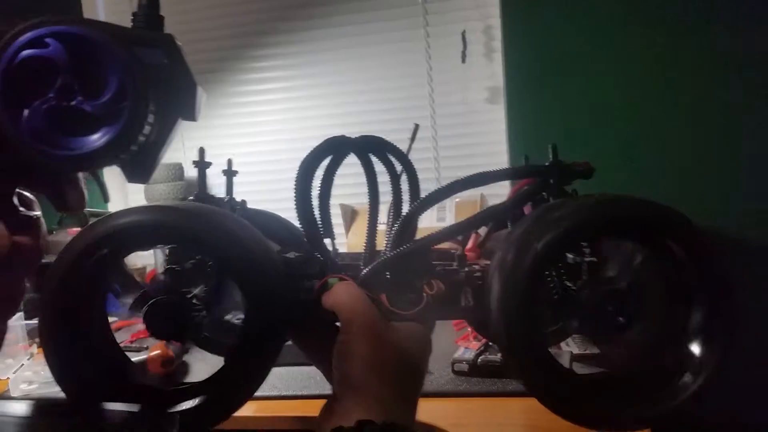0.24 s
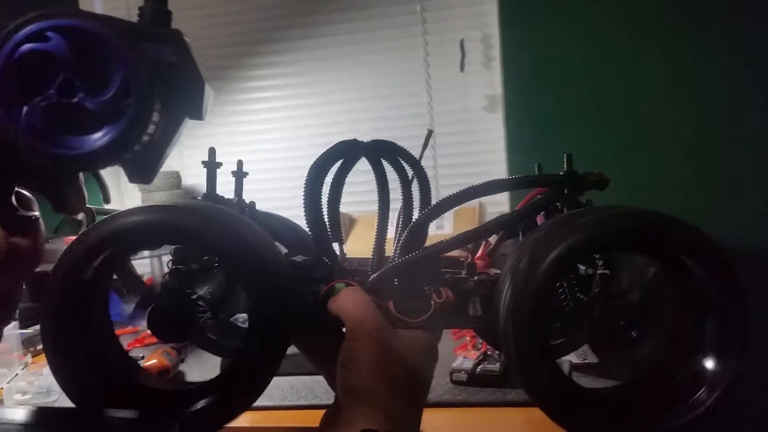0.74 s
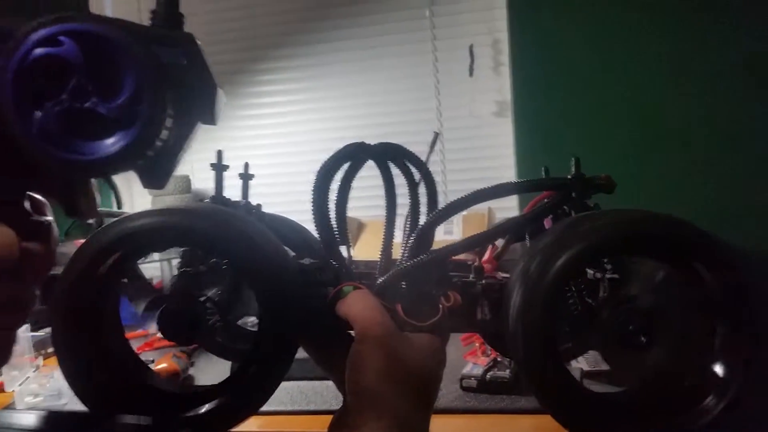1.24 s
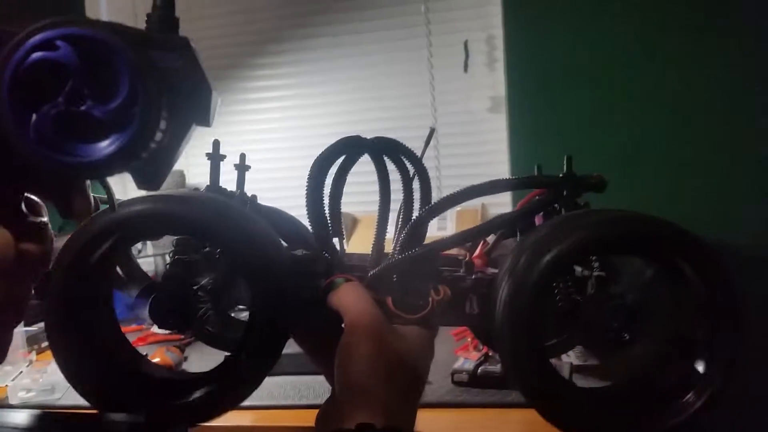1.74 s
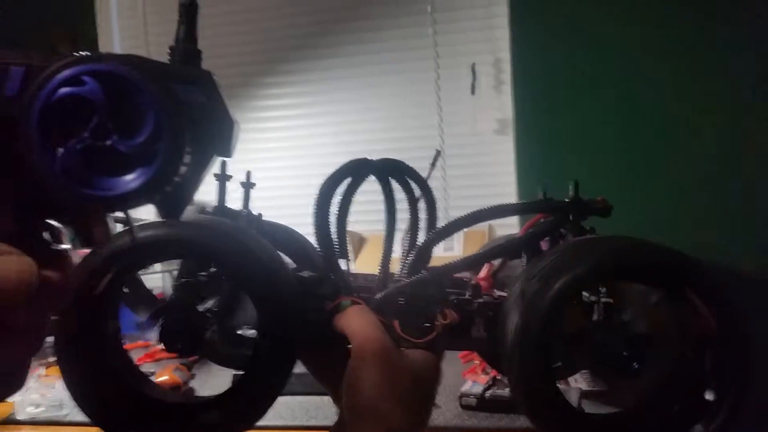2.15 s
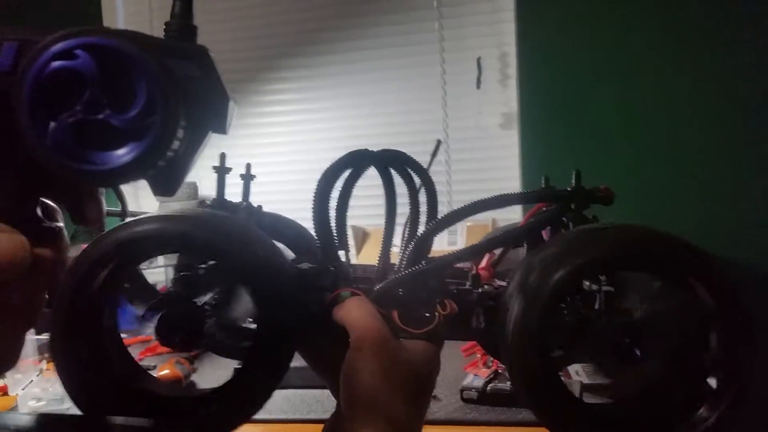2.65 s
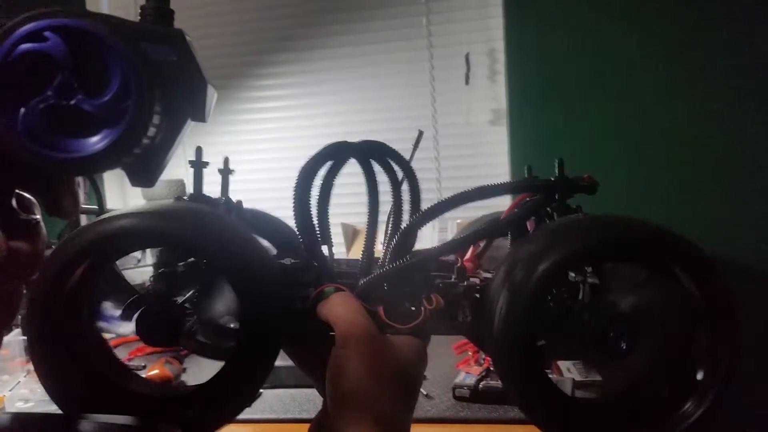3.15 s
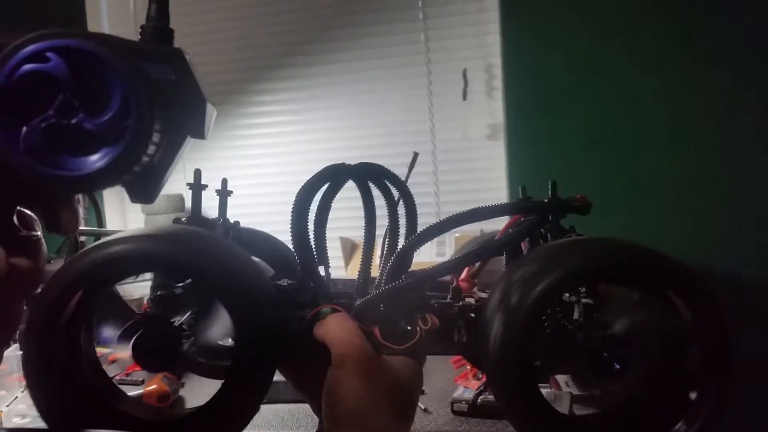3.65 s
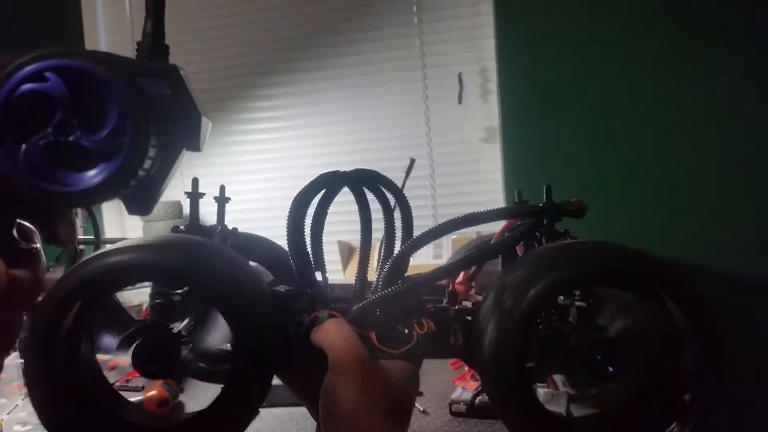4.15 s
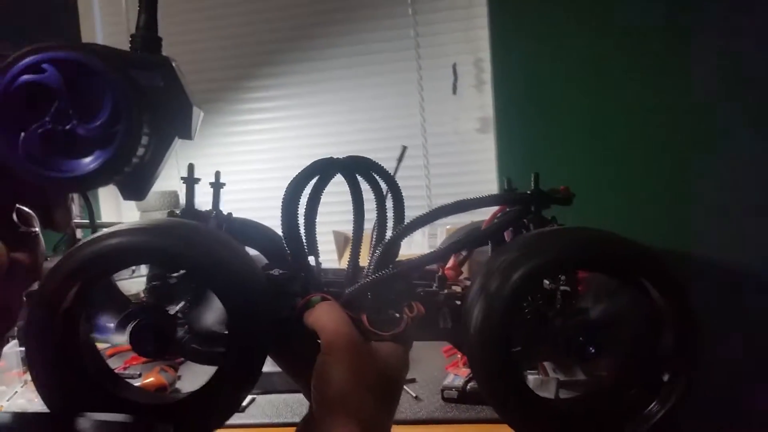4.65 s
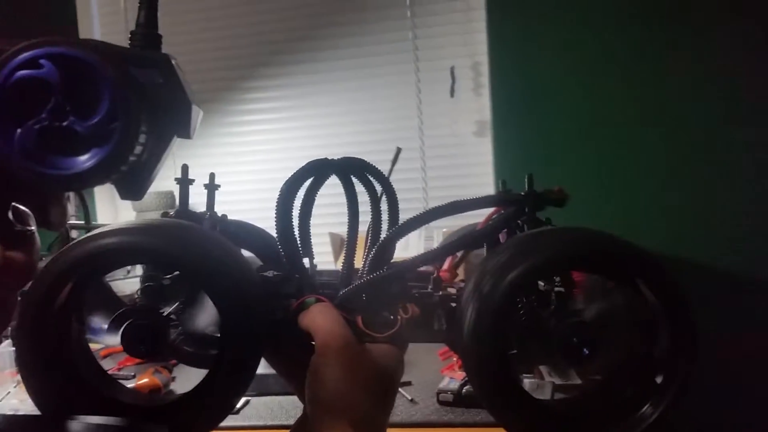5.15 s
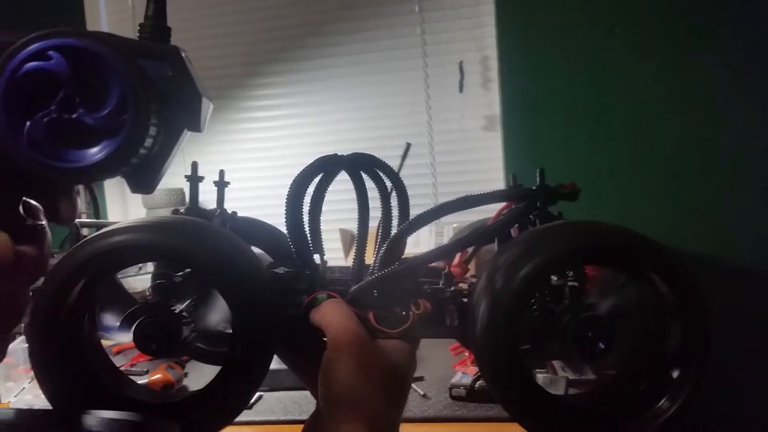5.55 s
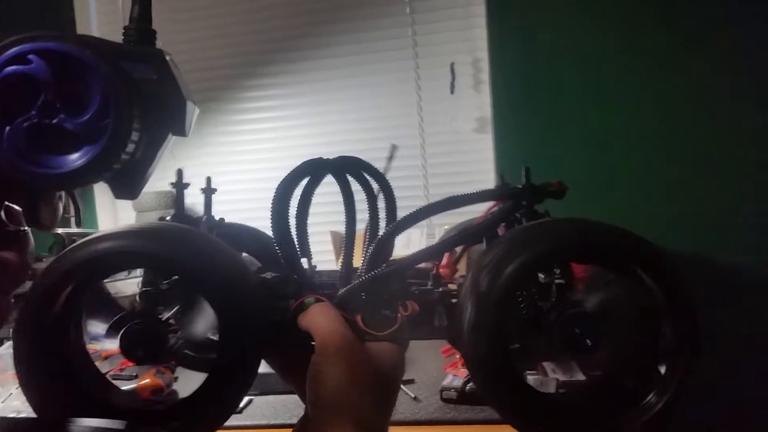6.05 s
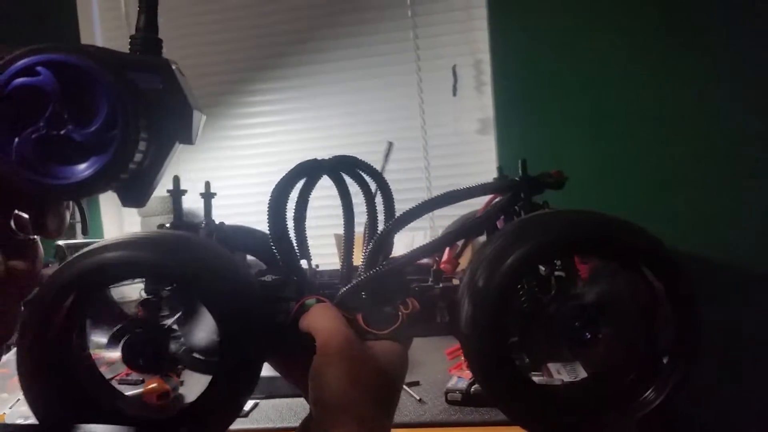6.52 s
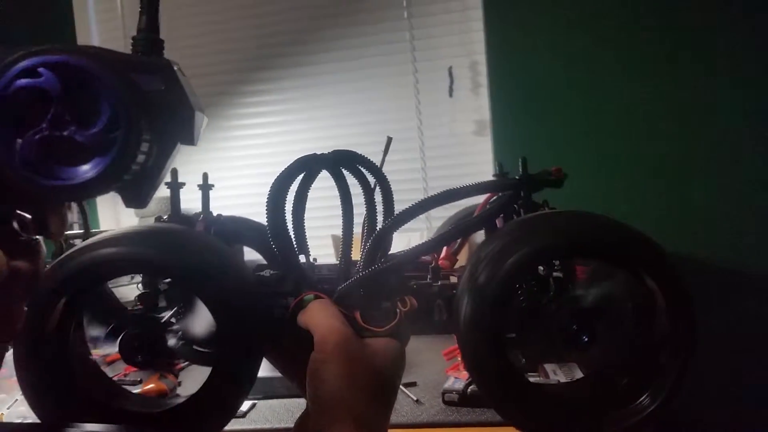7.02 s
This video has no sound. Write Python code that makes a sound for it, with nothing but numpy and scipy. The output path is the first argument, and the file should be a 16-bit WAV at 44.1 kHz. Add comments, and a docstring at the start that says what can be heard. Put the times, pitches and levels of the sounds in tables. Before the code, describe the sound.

A model truck's electric drive is already running at the start, held up close to the microphone in a garage with short, dense reflections. From 0 to 2.5 seconds a grainy, wobbling gear whine rises from about 850 to 1650 hertz, fairly subdued, with tooth scrape, loose chatter and bevel gear hum below. Low rumble from the grip lies underneath; soft thuds come near 0.5 and 1.9 seconds, then the strongest cluster at 2.1 to 2.5. From 3 to 5 seconds the whine climbs past 3 kilohertz, louder and brighter, flickering as it sweeps through resonances; slight bumps fade out before 5. From 5 to 7.3 seconds it accelerates steeply toward 8 kilohertz, a shrill scream with dense hissing rattle, ringing frame parts and a growing low tyre rush. It cuts off near top speed.

```python
"""An electric motor spins the free wheels of a model truck, held up in a garage, faster and faster.
The unloaded spur gear whines and rattles in its play: sine overtones of the tooth rate and gated noise.
Bevel gears hum under it as tones locked to the shaft, and chassis resonances colour all gear sound.
The tyres fan the air as filtered noise; an unsteady hand adds low rumble and bumps on the microphone."""
import sys
import numpy as np
from scipy import signal
from scipy.fft import rfft, irfft, next_fast_len
from scipy.io import wavfile
from scipy.ndimage import uniform_filter1d, map_coordinates

SR = 44100
rng = np.random.default_rng(int(sys.argv[2]) if len(sys.argv) > 2 else 0)


def file_out(sig):
    """Save sig as 16-bit WAV at sys.argv[1]."""
    # one column per channel
    cols = np.atleast_2d(sig).T
    # limit, then scale
    lim = np.clip(cols, -1, 1)
    pcm = np.round(lim * 32767).astype(np.int16)
    wavfile.write(sys.argv[1], SR, pcm)


N = 321048
TIME = np.arange(N) / SR
SPUR_TEETH, PINION_TEETH, BEVEL_TEETH = 58, 21, 13


def amp(db):
    """Decibels to gain."""
    return 10 ** (np.asarray(db) / 20)


def unit(x):
    """Scales to rms 1."""
    return x / np.sqrt(np.mean(x ** 2) + 1e-20)


def curves(rows, t):
    """Every column of a time table at the times t."""
    times, *columns = np.transpose(rows)
    return [np.interp(t, times, column) for column in columns]


def spectra(rows, hz):
    """Every column of a frequency table at hz, on a log axis."""
    table_hz, *columns = np.transpose(rows)
    return np.array([np.interp(np.log(hz + 1), np.log(table_hz), column) for column in columns])


def wander(position, per_unit):
    """Smooth chance of rms 1 that takes per_unit new values in each shaft turn (or second)."""
    values = rng.standard_normal(1 << 16)
    return unit(map_coordinates(values, [position * per_unit], order=3, mode="wrap"))


# the throttle opens slowly: (time [s], drive shaft speed [turns/s])
SHAFT_SPEED = [(0.0, 14.56), (0.5, 18.77), (1.0, 21.84), (1.75, 25.55), (2.5, 28.35), (3.0, 32.6),
               (3.25, 34.8), (3.5, 37.7), (4.25, 49.1), (4.75, 57.4), (5.25, 68.7), (5.75, 83),
               (6.25, 97.5), (6.5, 108), (6.75, 118.5), (7.0, 129), (7.28, 136)]


def shaft_speed():
    """The rising speed of the drive shaft, which drives every gear sound."""
    return curves(SHAFT_SPEED, TIME)[0]


# how freely the spur swings in its play: (time [s], factor on the swing [1])
LOOSENESS = [(0.2, 0.66), (1.3, 0.93), (2.2, 1.247), (3.4, 1.32), (4.4, 0.89), (5.2, 0.85), (5.8, 1.48),
             (6.3, 1.18), (7.2, 0.76)]


def backlash(turns, slack=0.21, slack_per_turn=3.0, chatter=0.047, chatter_per_turn=10.0, runout=0.1):
    """The unloaded spur swings to and fro in its play (in teeth)."""
    slow_swing = slack * wander(turns, slack_per_turn)
    fast_swing = chatter * wander(turns, chatter_per_turn)
    loose = curves(LOOSENESS, TIME)[0]
    return (slow_swing + fast_swing) * loose + runout * np.sin(2 * np.pi * turns)


CRUISE_TURNS_PER_S = 50
# tooth rate and its overtones in order, before the level moves below:
# (level at cruising speed [dB], growth [dB per doubling of speed])
PARTIALS = [(-9, 2.17), (-12, 5.5), (-15.5, 5.5), (-15, 9.5)]
# level moves of the whine's overtones: (time [s], second partial lift [dB], higher partials lift [dB])
OVERTONE_LIFTS = [(0, 5, 9), (0.4, 3.5, 4), (0.65, 5.5, -4), (1.05, 4.5, -5), (2.0, -1.5, 0),
                  (3.3, -0.5, 1), (4.2, -11, -1), (4.7, 1, -4), (5.5, 3.5, 1), (6.3, 2.5, 5), (7.28, -2, 1)]


def whine(turns, swing, speed, once=0.2, twice=0.35, rough=0.069):
    """Tooth-rate partials grow with speed; the slightly oval spur presses harder once and twice a turn."""
    press = 1 + once * np.cos(2 * np.pi * turns) + twice * np.cos(4 * np.pi * turns)
    press = unit(press * np.exp(rough * wander(turns, 6.0)))
    teeth = SPUR_TEETH * turns + swing  # the swing smears each overtone more widely than the one below
    second_db, higher_db = curves(OVERTONE_LIFTS, TIME)
    doublings = np.log2(speed / CRUISE_TURNS_PER_S)
    partials = np.zeros(N)
    for k, (db, growth_db) in enumerate(PARTIALS, 1):
        level_db = db + growth_db * doublings + (k == 2) * second_db + (k > 2) * higher_db
        below_nyquist = k * SPUR_TEETH * speed < SR / 2
        partials += amp(level_db) * unit(np.sin(2 * np.pi * k * teeth)) * below_nyquist
    return press * partials


# clean drive train tones before the speed laws, as a mapping; multiples of 13 are the bevel gears:
# (order [cycles per shaft turn], level [dB])
SHAFT_TONES = {8: -24, 10: -24, 12: -27, 13: -17, 14: -28, 16: -25, 18: -24, 20: -28, 26: -24, 29: -29, 39:
               -27}


def hum(turns, speed, bevel_db=0.0, flaws_db=-34.5, waver=0.35, full_speed=63.0, growth=0.98,
        fade_speed=85.3, fade=1.61, flaws_growth=1.2, count=64):
    """Bevel tones swell, then fade near top speed; a faint comb from tooth flaws keeps growing."""
    angle = np.linspace(0, 1, 1 << 12)  # one shaft turn, alike every time round
    tones = {}
    for k in range(1, count):
        tone = unit(np.sin(2 * np.pi * (k * angle + rng.random())))
        tones[k] = amp(SHAFT_TONES.get(k, flaws_db)) * tone
    bevel_turn = sum(tone for k, tone in tones.items() if k % BEVEL_TEETH == 0)
    flaws_turn = sum(tone for k, tone in tones.items() if k % BEVEL_TEETH)
    bevel = np.interp(turns % 1, angle, bevel_turn)
    flaws = np.interp(turns % 1, angle, flaws_turn)
    swell = np.minimum(speed / full_speed, 1) ** growth  # speeds in turns/s
    sink = np.minimum(fade_speed / speed, 1) ** fade
    bevel *= amp(bevel_db) * swell * sink
    flaws *= (speed / speed.max()) ** flaws_growth
    return (bevel + flaws) * (1 + waver * wander(turns, 0.3))


def rattle(turns, teeth, gating=0.46, shaft_throb=0.019, motor_throb=0.12, uneven=0.12,
           knock_db=-19.5, knocks_per_turn=5.0):
    """A noise scrape per tooth throbs with shaft and rotor, with sharper knocks; each side has its own mix."""
    rotor = turns * SPUR_TEETH / PINION_TEETH
    throb = 1 + shaft_throb * np.cos(2 * np.pi * turns) + motor_throb * np.cos(2 * np.pi * rotor)
    contact = (1 + gating * np.cos(2 * np.pi * teeth)) * np.exp(uneven * wander(turns, 5.0))
    scrape = unit(contact * rng.standard_normal((2, N)))
    knock_now = rng.random(N) < knocks_per_turn * np.gradient(turns)
    knocks = unit(rng.standard_normal((2, N)) * knock_now)
    return unit(throb * (scrape + amp(knock_db) * knocks))


def garage(x, wet_db=5.5, t60=0.38, left_lag_ms=0.23):
    """The direct sound reaches the right side first; bench and walls add dense reflections."""
    x = np.broadcast_to(x, (2, N))
    t = np.arange(SR // 2) / SR
    taps = rng.choice([-1., 1.], (2, len(t))) * (rng.random((2, len(t))) < 3000 / SR)  # 3000 per second
    taps *= amp(-60 * t / t60) * (t > 0.002)
    taps /= np.linalg.norm(taps, axis=1, keepdims=True)
    wet = signal.fftconvolve(x, taps, axes=1)[:, :N]
    direct = np.array([np.roll(x[0], round(left_lag_ms * SR / 1000)), x[1]])
    return (direct + amp(wet_db) * wet) / np.hypot(1, amp(wet_db))


# modes of the gears on their shafts; tones swell or sink as they sweep through:
# (frequency [Hz], width [Hz], lift [dB])
GEAR_MODES = [(1183, 35, 4), (1343, 102, 8), (1660, 230, 5), (2016, 190, 5), (2579, 160, 7.5),
              (2780, 220, -2.5), (3105, 345, 9.5), (3434, 250, -14), (3900, 810, 5), (5470, 1000, 4.5),
              (6180, 590, 5.5), (8830, 800, -4.5), (12336, 3200, 6.5), (15500, 1100, -4)]


def shafts(x):
    """The gear tones pass through the modes of the gears and their shafts."""
    size = next_fast_len(N + SR // 8)
    hz = np.fft.rfftfreq(size, 1 / SR)
    db = sum(lift_db / (1 + (2 * (hz - centre) / width) ** 2) for centre, width, lift_db in GEAR_MODES)
    return irfft(rfft(x, size) * amp(db), size)[:, :N]


BRIGHTNESS = 0.51  # treble tilt in dB per octave for each dB of force
# how hard the teeth strike: (time [s], force level at the pivot frequency [dB])
TOOTH_FORCE = [(0.0, -11), (1.0, -6.5), (2.35, -6.5), (3.1, -3), (3.9, -1), (4.5, -2), (4.9, -1.2),
               (5.8, -0.34), (6.4, -1.8), (7.0, -0.5), (7.28, -0.7)]


def hardness(x, pivot_hz=4000.0, low_octaves=0.94, high_octaves=4.8):
    """Harder tooth blows are louder and brighter."""
    hz, t, spectrum = signal.stft(x, SR, nperseg=512)
    force_db, = curves(TOOTH_FORCE, t)
    octaves = np.clip(np.log2((hz + 1) / pivot_hz), -low_octaves, high_octaves)
    gain = amp(force_db * (1 + BRIGHTNESS * octaves[:, None]))
    return signal.istft(spectrum * gain, SR, nperseg=512)[1][:, :N]


# broad chassis colour before the resonances and low cut:
# (frequency [Hz], left level [dB per Hz], right level [dB per Hz])
CHASSIS_COLOUR = [(101, -84.5, -79), (300, -85, -82.5), (584, -86.5, -75), (886, -84.5, -74.5),
                  (1197, -89, -65.5), (1583, -85.5, -67.5), (1973, -86.5, -61.5), (3400, -84, -61.5),
                  (5010, -71.5, -63), (6880, -68.5, -57.5), (8640, -67.5, -65), (10400, -65, -64.5),
                  (13300, -62.5, -62), (15700, -64.8, -71)]
# chassis and gear case resonances: (frequency [Hz], width [Hz], left lift [dB], right lift [dB])
CHASSIS_RESONANCES = [(1307, 39, 10, -2.5), (2000, 520, 6, 2.5), (2686, 310, 11, 3.5), (2750, 90, 4, -0.5),
                      (3490, 750, 15, 0.5), (4230, 780, 2.5, 3.5), (5140, 590, 3.5, 2.5),
                      (5620, 165, 5.5, 5.5), (6450, 200, 6.5, 2.5), (7700, 134, 5, 5.5),
                      (8495, 490, 5, 8.5), (9340, 300, 9.5, 8), (12500, 200, 0.5, -15),
                      (13200, 310, 7.5, -16)]


def chassis(x, low_cut_hz=55.0):
    """The plastic frame and gear case radiate the blows, a different colour to each side."""
    size = next_fast_len(N + SR // 8)
    hz = np.fft.rfftfreq(size, 1 / SR)
    db = spectra(CHASSIS_COLOUR, hz)
    for centre, width, *lift_db in CHASSIS_RESONANCES:
        db = db + np.array(lift_db)[:, None] / (1 + (2 * (hz - centre) / width) ** 2)
    low_cut = hz / np.hypot(hz, low_cut_hz)
    gain = amp(db) * np.sqrt(SR / 2) * low_cut  # the root turns level per Hz into gain on white noise
    return irfft(rfft(x, size) * gain, size)[:, :N]


# rumble colour, scaled to rms 1 when played: (frequency [Hz], relative level [dB per Hz])
RUMBLE_COLOUR = [(10, -18), (30, -3.5), (55, 4.5), (80, -6), (130, -9), (300, -31), (900, -51), (4000, -90)]


def rumble(left_db=-61.0, right_db=-52.0, patchy_db=-2.0):
    """The unsteady grip on the microphone stirs a low, lumpy rumble of coloured noise."""
    colour = amp(spectra(RUMBLE_COLOUR, np.fft.rfftfreq(N, 1 / SR)))
    noise = unit(irfft(rfft(rng.standard_normal((2, N))) * colour, N))
    grip_db = np.interp(TIME, [0, 4.8, 5.8], [0.5, -1.5, -7.])
    lumps_db = patchy_db * wander(TIME, 13.0)  # 13 new values a second
    return noise * amp(grip_db + lumps_db) * amp([[left_db], [right_db]])


# handling bumps: (time [s], level before band-pass and side gains [dB], ring frequency [Hz])
BUMPS = [(0.472, -37, 46), (0.502, -38, 46), (0.573, -40, 59), (0.624, -37, 63.5), (1.519, -42, 83.5),
         (1.861, -32, 106.1), (2.074, -30.5, 74), (2.106, -36, 75.2), (2.22, -36, 87), (2.241, -29, 74),
         (2.391, -33, 54), (2.419, -26, 61.5), (2.439, -29, 61), (2.464, -26, 59), (2.484, -28.5, 74),
         (2.616, -36.5, 50.4), (2.966, -37, 79), (3.13, -34.5, 82), (3.458, -38, 70), (4.325, -38, 67.95),
         (4.73, -40, 51), (4.802, -41, 71)]


def bumps(t60=0.11, push_db=0.0, push_s=0.00038, scuff_db=-8.0, scuff_s=0.013, low_hz=30.0, dull_hz=287.0,
          left_db=-10.0, right_db=5.5):
    """Each bump is a soft push, a scuff of skin and a short low ring of the microphone's housing."""
    out = np.zeros(N + SR)
    t = np.arange(SR // 4) / SR
    for start, db, hz in BUMPS:
        ring = np.sin(2 * np.pi * hz * t) * amp(-60 * t / t60)
        push = (1 - t / push_s) * np.exp(-t / push_s)
        skin = unit(uniform_filter1d(rng.standard_normal(len(t)), size=110))  # noise smoothed dull
        scuff = skin * np.exp(-t / scuff_s)
        bump = ring + amp(push_db) * push + amp(scuff_db) * scuff
        out[round(start * SR):][:len(t)] += amp(db) * bump
    band = signal.butter(2, [low_hz, dull_hz], "band", fs=SR, output="sos")
    return signal.sosfilt(band, out[:N]) * amp([[left_db], [right_db]])


def tyre_wind(speed, left_db=-58.5, right_db=-49.5, low_hz=154.0, high_hz=333.0, growth=1.76):
    """The tread fans the air: a low rush of noise that rises steeply with speed."""
    band = signal.butter(2, [low_hz, high_hz], "band", fs=SR, output="sos")
    rush = unit(signal.sosfilt(band, rng.standard_normal((2, N))))
    return rush * (speed / speed.max()) ** growth * amp([[left_db], [right_db]])


# narrow bands that sing at high speed: two low ones, and frame parts above 5 kHz: # (frequency [Hz], width
# [Hz], left level at full speed [dB], right level at full speed [dB])
RINGING_PARTS = [(165, 50, -59, -52), (610, 100, -62, -52), (5620, 330, -43, -32), (12300, 240, -36, -45),
                 (13350, 260, -29, -41)]


def ringing(blows, speed, growth=3.0):
    """At high speed, narrow resonators on the rattle sing out: two low bands, and a few parts of the frame
    above 5 kHz."""
    out = np.zeros((2, N))
    for hz, width, left_db, right_db in RINGING_PARTS:
        part = unit(signal.lfilter(*signal.iirpeak(hz, hz / width, SR), blows))
        out += amp([[left_db], [right_db]]) * part
    return out * (speed / speed.max()) ** growth


def gears(speed):
    """The whole drive train, all played by the speed of the shaft."""
    turns = np.cumsum(speed) / SR
    swing = backlash(turns)
    tones = garage(whine(turns, swing, speed)) + garage(hum(turns, speed), wet_db=-4.5)
    blows = garage(rattle(turns, SPUR_TEETH * turns + swing), wet_db=-5.5)
    return chassis(hardness(shafts(tones) + blows)) + ringing(blows, speed)


def scene():
    """Truck and handling noise."""
    speed = shaft_speed()
    return gears(speed) + rumble() + bumps() + tyre_wind(speed)


def record(dry, edge_hz=15850):
    """The recorder's band limit: a steep low-pass."""
    lowpass = signal.firwin(801, edge_hz, window=("kaiser", 9), fs=SR)
    return signal.oaconvolve(dry, lowpass[None], "same")


dry = scene()
out = record(dry)
file_out(out)
```